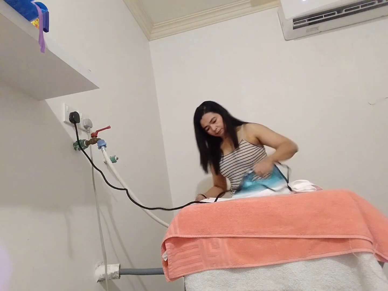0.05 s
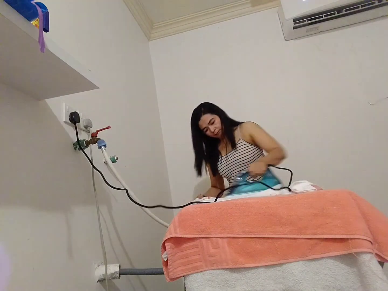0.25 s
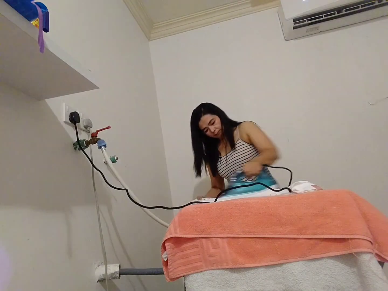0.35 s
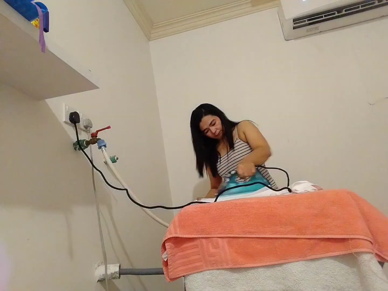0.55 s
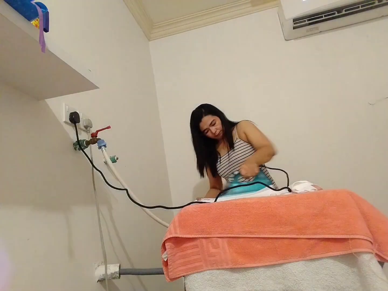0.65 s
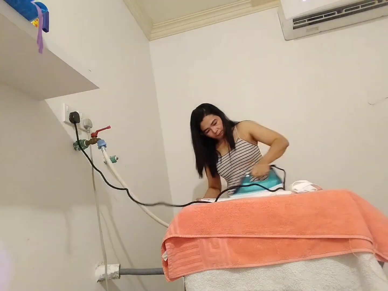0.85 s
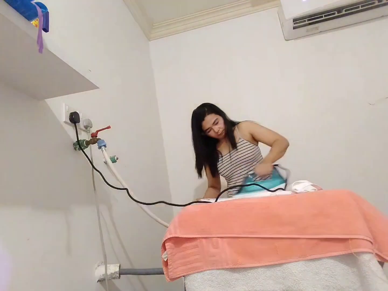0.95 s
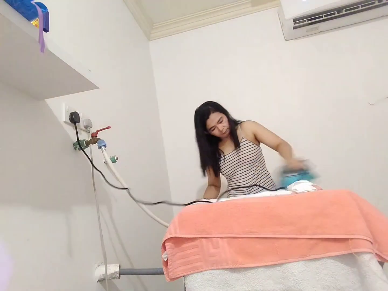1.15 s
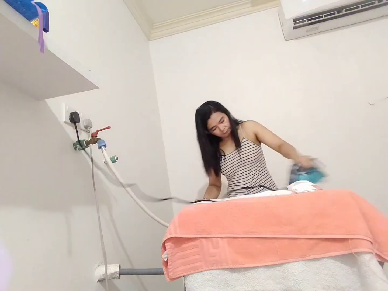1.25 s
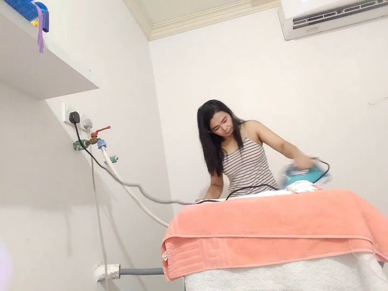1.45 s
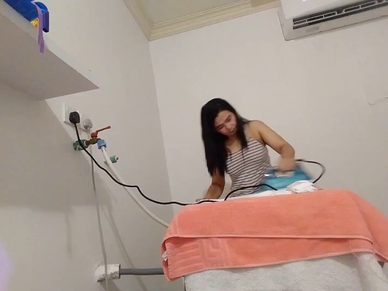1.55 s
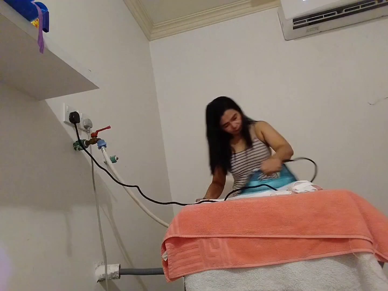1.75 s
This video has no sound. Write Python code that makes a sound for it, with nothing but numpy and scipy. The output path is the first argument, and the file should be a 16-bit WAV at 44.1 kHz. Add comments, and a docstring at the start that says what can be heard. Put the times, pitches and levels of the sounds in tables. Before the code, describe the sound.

An iron lands on an ironing board with a thud and plastic clacks, air conditioner humming.

```python
"""An air conditioner hums and blows in a small room, from start to end. A steam iron is set down on a
padded ironing board: its shell taps, the padding knocks and the board booms. Hard plastic clacks follow.
The iron then swishes over the cloth three times. The first, heavy stroke makes the board shudder and
the iron's loose parts tick. Near the end, the shell taps again faintly."""
import sys
import numpy as np
from scipy import signal
from scipy.fft import rfft, irfft, next_fast_len
from scipy.io import wavfile
from scipy.ndimage import map_coordinates

SR = 44100
rng = np.random.default_rng(int(sys.argv[2]) if len(sys.argv) > 2 else 0)


def bounce(signal):
    """Save signal as a 16-bit WAV file at the path given by the first command-line argument."""
    frames = np.transpose(np.atleast_2d(signal))
    limited = np.clip(frames, -1, 1)
    pcm = np.round(limited * 32767).astype(np.int16)
    wavfile.write(sys.argv[1], SR, pcm)


N = 79380  # 1.8 seconds

# when the iron's shell taps: start_s, level_db
TAP_TIMES = [(0.2205, -36), (0.2280, -45), (1.6960, -52), (1.7040, -50), (1.7260, -57)]
# a tap's tone colour (how strong each pitch is): pitch_hz, relative_db
TAP_COLOUR = [(800, -13.5), (1800, 0), (2800, -22.5), (3600, -10), (4050, 2.5), (4300, -8.5), (4700, -1),
              (5200, -14), (6200, -15.5), (7700, -12), (8500, -1.5), (9300, -6), (10300, -10),
              (11500, -10.5)]
def shell_taps():
    """The iron's shell rings briefly as it lands, and again faintly near the end."""
    return clicks(TAP_TIMES, TAP_COLOUR, scrape=0.34, scrape_fade_s=0.012, echo_db=-2)


# the low notes the board rings at: pitch_hz, relative_db, rise_s, fade_s
BOARD_NOTES = [(67.7, 6.5, 0.03, .32), (104, -16, 0.012, 0.28), (125.5, -11, .004, 0.14),
               (165, -24, 0.0075, 0.34)]
LANDING_S, HAND_DAMPS_S = 0.2185, 0.355
def board_boom():
    """The iron's weight makes the board swell into a low boom, until the hand quiets it."""
    t = np.maximum(seconds() - LANDING_S, 0)
    boom = np.zeros(N)
    for hz, db, rise_s, fade_s in BOARD_NOTES:
        swell = 1 - np.exp(-(t / rise_s) ** 2)
        boom += amp(db) * swell * fade(t, fade_s) * np.sin(2 * np.pi * hz * t)
    return -amp(-18) * boom * fade(seconds() - HAND_DAMPS_S, fade_s=0.06)


# the knock's dull tone colour: pitch_hz, relative_db
KNOCK_COLOUR = [(120, -5), (250, -2), (600, 3), (1200, -5), (2000, -16), (3500, -27), (6000, -48)]
def padding_knock():
    """The iron's flat base meets the padding with a short, dull burst of noise."""
    t = seconds() - LANDING_S
    rise = np.clip(t / 0.0016, 0, 1)
    return amp(-42) * noise(KNOCK_COLOUR) * rise * fade(t, fade_s=0.095)


# when the plastic clacks: start_s, level_db
CLACK_TIMES = [(0.3240, -33.5), (0.3318, -39), (0.3515, -46)]
# a clack's tone colour: pitch_hz, relative_db
CLACK_COLOUR = [(800, -17), (2600, -14), (3600, -2), (3950, 7.5), (4150, 5), (4400, 8), (4750, -3),
                (5500, -8.5), (6200, -16), (6900, -6), (7600, -25), (8800, -10), (9600, -12),
                (10300, -16.5)]
def plastic_clacks():
    """The hard plastic of the iron and its cord clacks just after the landing."""
    return clicks(CLACK_TIMES, CLACK_COLOUR, scrape=0.48, scrape_fade_s=0.007, echo_db=-1.5)


# the iron's strokes over the cloth: start_s, end_s, level_db
STROKES = [(0.46, 0.73, -75.5), (.90, 1.043, -76), (1.158, 1.475, -78.5)]
# the tone colour of rubbed cloth: pitch_hz, relative_db
CLOTH_COLOUR = [(1500, -5.5), (3200, 8), (4000, 2), (4700, 0.5), (5300, -4), (6000, -10), (6900, -1),
                (7600, -8), (9200, 0), (10500, -7)]
def cloth_swishes():
    """The iron's base rubs the cloth, making a grainy hiss on each stroke."""
    push = sum(amp(db) * gate(start_s, end_s, edge_s=0.03) for start_s, end_s, db in STROKES)
    return push * noise(CLOTH_COLOUR) * amp(2 * wobble(55))


def board_shudder():
    """The first, heavy stroke drags on the board and keeps its lowest note going."""
    pitch_hz = 65.2
    tone = unit(np.sin(2 * np.pi * pitch_hz * seconds() + 0.2 * wobble(7.1)))
    return tone * amp(-45.5 + wobble(17.7)) * gate(start_s=0.465, end_s=0.71, edge_s=0.02)


# when the loose parts tick: start_s, level_db
TICK_TIMES = [(0.5885, -53), (0.5950, -69), (0.6087, -44), (0.6470, -48), (0.6617, -41.5), (0.6885, -55),
              (0.7005, -50), (0.8163, -56)]
# a tick's tone colour: pitch_hz, relative_db
TICK_COLOUR = [(800, -36), (2800, -18), (3550, -2.5), (4000, -10), (4500, -2), (5200, -14), (6300, -27),
               (7700, -12), (8400, -4), (8900, 5), (9500, -8), (10500, -27)]
def loose_part_ticks():
    """Loose parts in the iron tick finely as it slides."""
    return clicks(TICK_TIMES, TICK_COLOUR, scrape=0.3, scrape_fade_s=0.004, echo_db=-2)


# the tone colour of the rushing air: pitch_hz, relative_db
AIR_COLOUR = [(100, -18.5), (165, -8), (200, -0.5), (255, 1.5), (290, -2.5), (370, -3), (430, -6.5),
              (750, -10.5), (950, -14.5), (1350, -16.5), (2000, -23.5), (2800, -32.5), (4000, -42.5),
              (6000, -50.5), (7700, -63), (9400, -49.5), (10500, -70)]
# how loud the rushing air is over time: time_s, level_db
AIR_LEVEL = [(0, -45), (.2, -45), (.45, -48), (.8, -47), (1.05, -45.5), (1.3, -45.5), (1.55, -46),
             (1.8, -44.5)]
# the motor's tones: pitch_hz, level_db
MOTOR_TONES = [(49, -58.5), (57.5, -56), (129.2, -60.5), (207, -57.5), (251, -67.5), (344.3, -59.5),
               (464.5, -60), (506, -70.5), (703, -67), (756, -65.5), (1109, -84.5), (1687, -83.5),
               (1917, -81.5), (2266, -97)]
# the tone colour of the room's low rumble: pitch_hz, relative_db
RUMBLE_COLOUR = [(20, -57), (40, -34), (48, 0), (58, 0), (70, 0), (95, 0), (110, -5), (128, 8.5), (146, 2),
                 (162, -23), (190, 0), (240, -48)]
def air_conditioner():
    """Air rushes, the motor hums a little unsteadily, and the room rumbles at its own low notes."""
    t = seconds()
    air_db = np.interp(t, *np.transpose(AIR_LEVEL))
    air = noise(AIR_COLOUR) * amp(air_db + 0.66 * wobble(11.7))
    hum = np.zeros(N)
    for hz, db in MOTOR_TONES:
        level = amp(db + 1.47 * wobble(5.15))
        phase = 2 * np.pi * (hz * t + rng.random()) + 0.43 * wobble(5.8)
        hum += level * unit(np.sin(phase))
    rumble = amp(-52) * noise(RUMBLE_COLOUR)
    return air + hum + rumble


# quick echoes off the near walls: delay_s, gain
WALL_ECHOES = [(.0017, 0.1), (.0028, 0.61), (.0082, .15), (0.012, 0.083)]
# how long the room rings at each pitch: pitch_hz, fade_s
ROOM_FADE = [(200, .3), (4000, 0.19), (10000, 0.15)]
def room(x, echo_db):
    """Sound bounces off the near walls and blurs into a fading tail, whose level is echo_db."""
    hz, t, bands = signal.stft(rng.standard_normal(SR // 3), SR, nperseg=256)
    tail = signal.istft(bands * fade(t, along(ROOM_FADE, hz)[:, None]), SR, nperseg=256)[1]
    echoes = amp(echo_db) * tail / np.linalg.norm(tail)
    echoes[0] += 1  # the direct sound
    for delay_s, gain in WALL_ECHOES:
        echoes[round(delay_s * SR)] += gain
    return signal.fftconvolve(x, echoes)


def clicks(times, colour, scrape, scrape_fade_s, echo_db):
    """Each contact is a snap and a brief scrape that make the plastic and the room ring."""
    out, plastic, t = np.zeros(2 * N), ring(colour), np.arange(1024) / SR
    for start_s, db in times:
        force = scrape * rng.standard_normal(len(t)) * fade(t, scrape_fade_s)
        force[0] = 1  # the snap
        hit = room(amp(db) * np.convolve(force, plastic), echo_db)
        out[round(start_s * SR):][:len(hit)] += hit
    return out[:N]


def ring(colour, size=2048):
    """How an object with this tone colour rings after one sharp hit."""
    gains = amp(along(colour, np.fft.rfftfreq(size, 1 / SR)))
    cepstrum = irfft(np.log(gains))
    # fold it so that all the ringing comes after the hit
    cepstrum[1:size // 2] *= 2
    cepstrum[size // 2 + 1:] = 0
    ringing = irfft(np.exp(rfft(cepstrum)))
    return ringing / np.linalg.norm(ringing)


def noise(colour):
    """Noise with this tone colour, at a standard level."""
    return unit(filtered(rng.standard_normal(N), lambda hz: amp(along(colour, hz))))


def filtered(x, gain_at):
    """Turn each pitch in x up or down by gain_at(hz)."""
    size = next_fast_len(N + SR // 2)
    return irfft(rfft(x, size) * gain_at(np.fft.rfftfreq(size, 1 / SR)), size)[:N]


def along(table, hz):
    """Read a table between its pitches, with octaves evenly spaced."""
    pitches, values = np.transpose(table)
    return np.interp(np.log(hz + 1), np.log(pitches + 1), values)


def wobble(rate_hz):
    """A smooth curve through rate_hz random values a second."""
    return map_coordinates(rng.standard_normal(256), [seconds() * rate_hz], mode="wrap")


def gate(start_s, end_s, edge_s):
    """Rise, hold and fall between two times."""
    t = seconds()
    return np.clip(np.minimum(t - start_s, end_s - t) / edge_s, 0, 1)


def fade(t, fade_s):
    """Die away from t = 0, dropping 60 dB every fade_s seconds."""
    return np.exp(-np.log(1000) * np.maximum(t, 0) / fade_s)


def amp(db):
    """Turn decibels into a number to multiply by."""
    return 10 ** (np.asarray(db) / 20)


def unit(x):
    """Scale to an average (rms) level of 1."""
    return x / np.sqrt(np.mean(x ** 2) + 1e-20)


def seconds():
    """The time of each sample."""
    return np.arange(N) / SR


def scene():
    """The iron at work over the air conditioner, in one channel."""
    plastic = shell_taps() + plastic_clacks() + loose_part_ticks()
    landing = board_boom() + padding_knock()
    sliding = board_shudder() + cloth_swishes()
    return (plastic + landing + sliding + air_conditioner())[None]


def record(dry):
    """The highest treble is cut away, leaving only a faint hiss up there."""
    top_hz, hiss_top_hz = 10500, 15450
    kept = filtered(dry[0], lambda hz: 1 / np.sqrt(1 + (hz / top_hz) ** 100))
    hiss = amp(-96) * rng.standard_normal(N)
    return filtered(kept + hiss, lambda hz: hz < hiss_top_hz)[None]


dry = scene()
out = record(dry)
bounce(out)
```